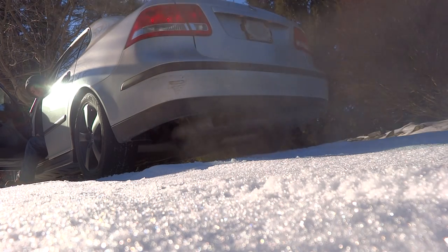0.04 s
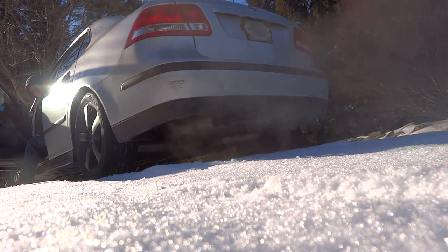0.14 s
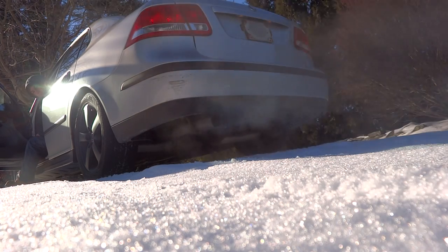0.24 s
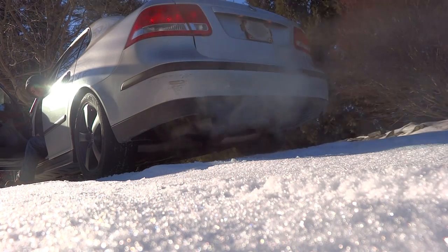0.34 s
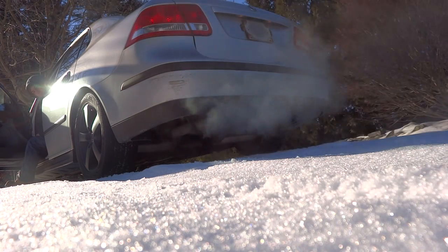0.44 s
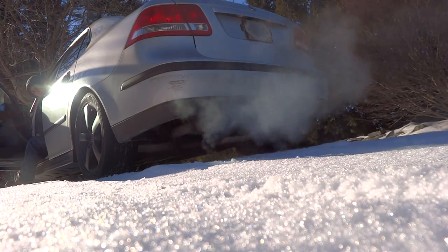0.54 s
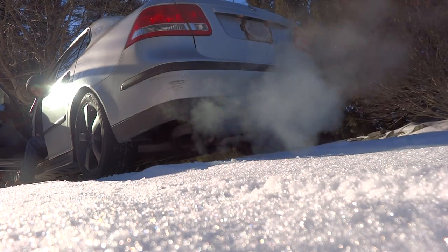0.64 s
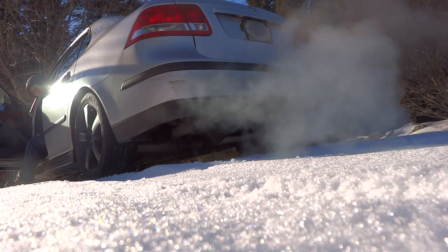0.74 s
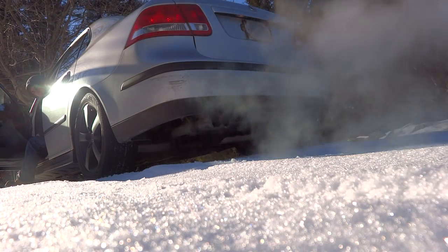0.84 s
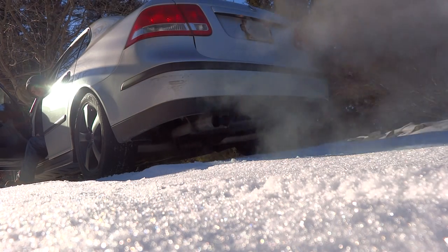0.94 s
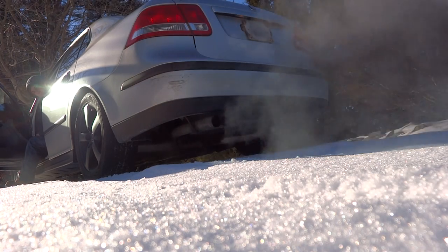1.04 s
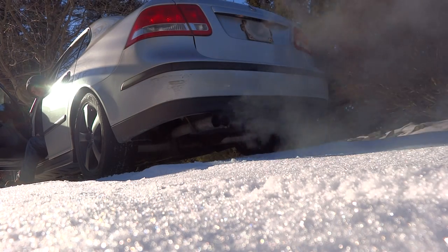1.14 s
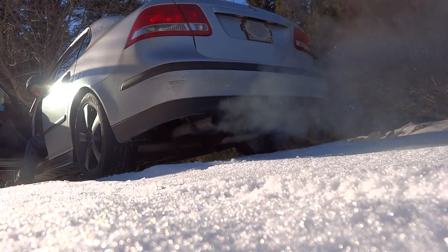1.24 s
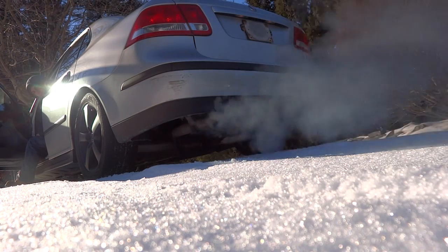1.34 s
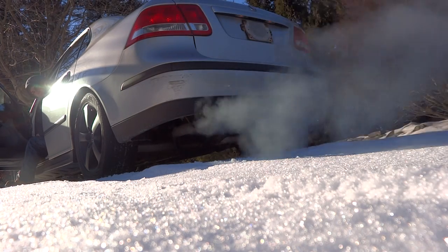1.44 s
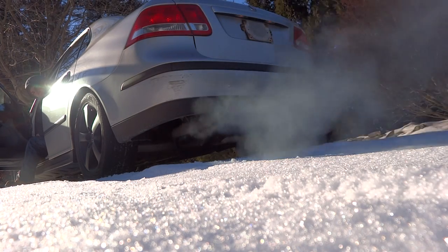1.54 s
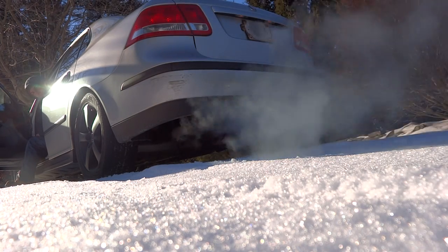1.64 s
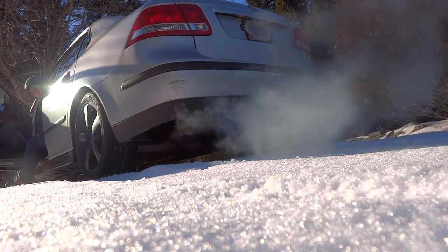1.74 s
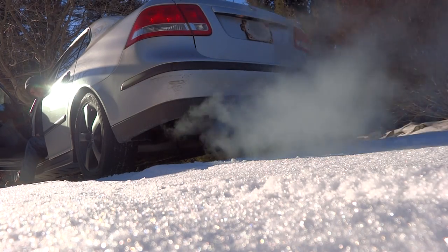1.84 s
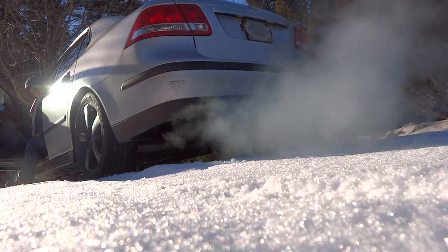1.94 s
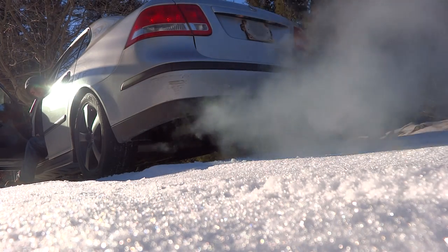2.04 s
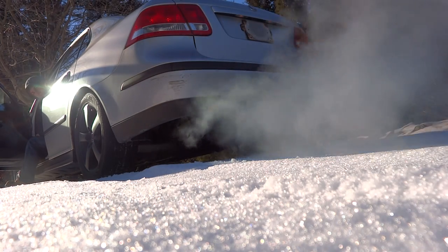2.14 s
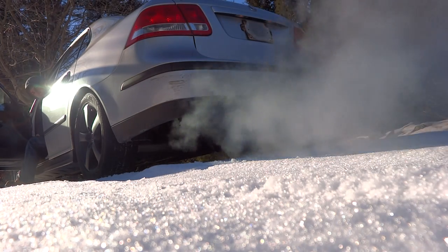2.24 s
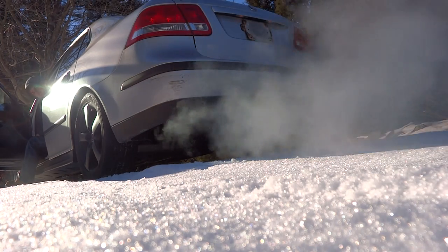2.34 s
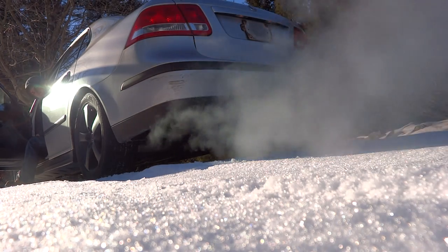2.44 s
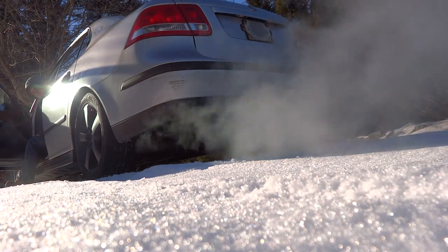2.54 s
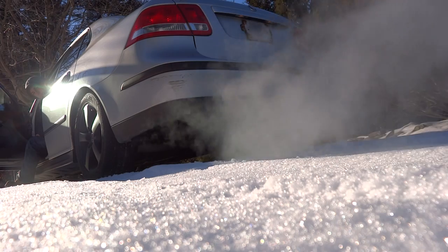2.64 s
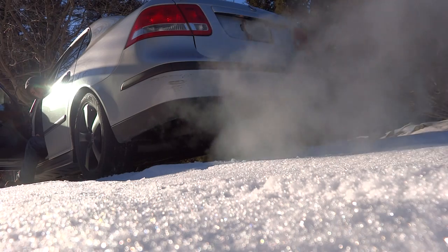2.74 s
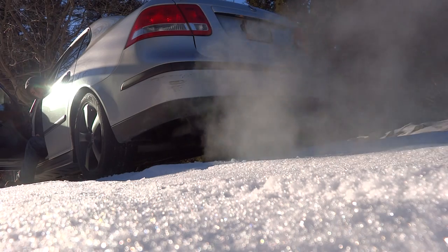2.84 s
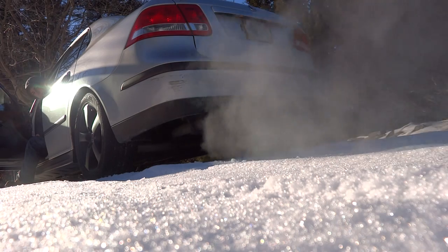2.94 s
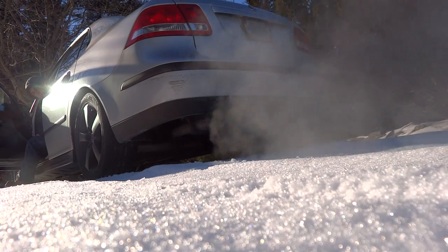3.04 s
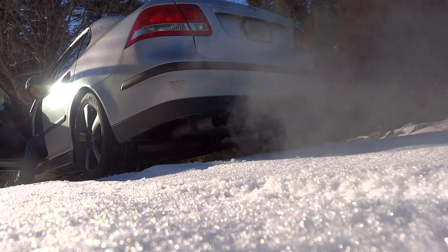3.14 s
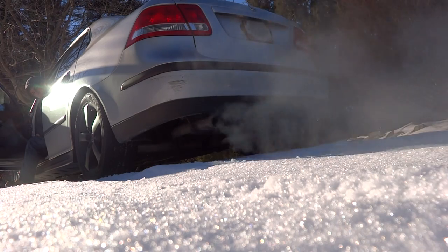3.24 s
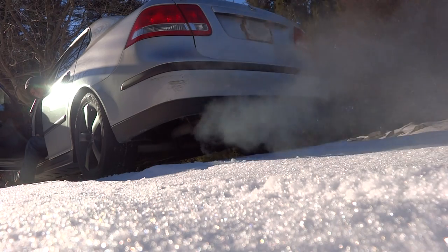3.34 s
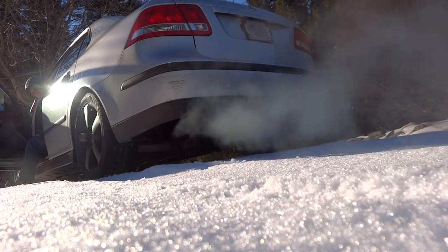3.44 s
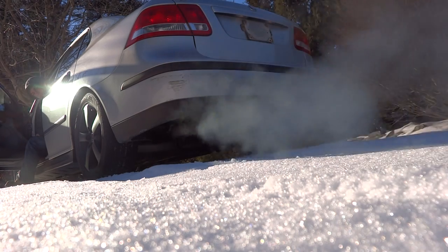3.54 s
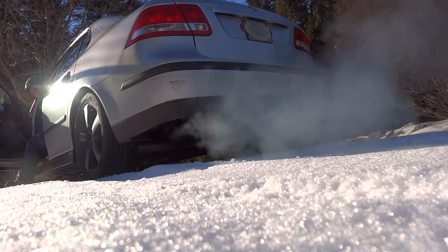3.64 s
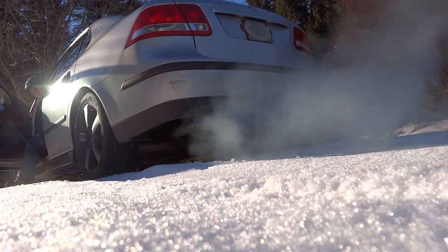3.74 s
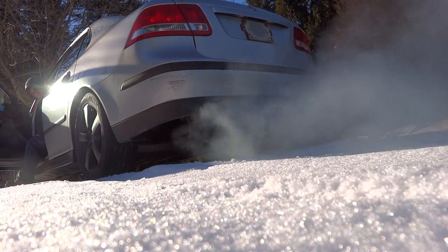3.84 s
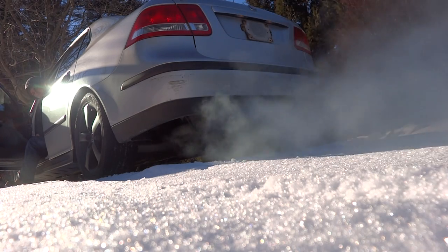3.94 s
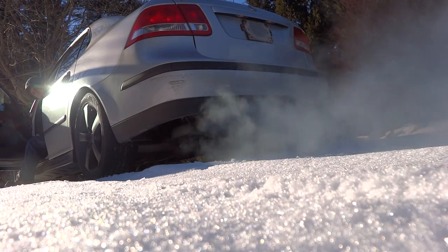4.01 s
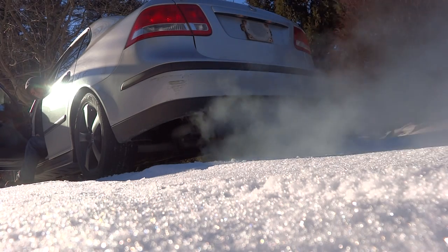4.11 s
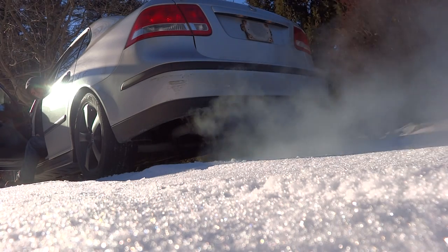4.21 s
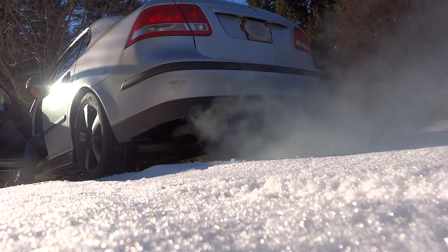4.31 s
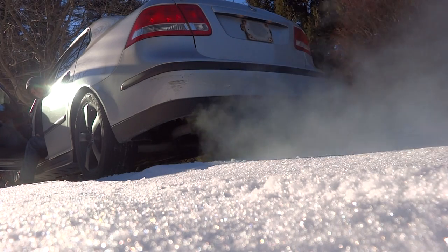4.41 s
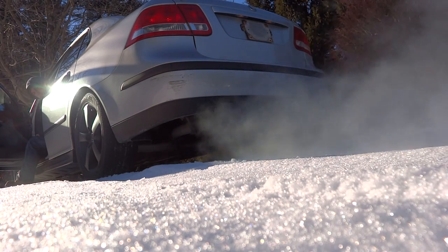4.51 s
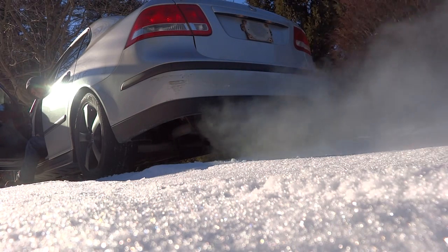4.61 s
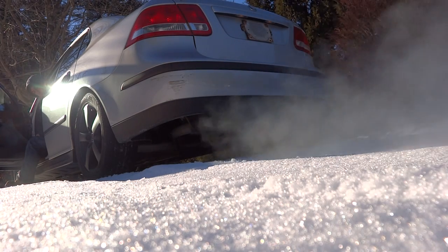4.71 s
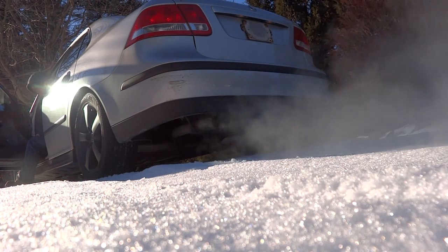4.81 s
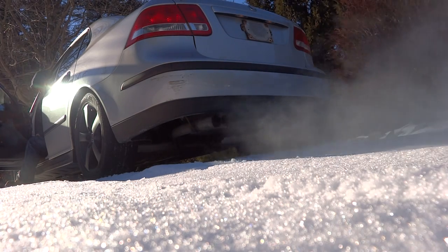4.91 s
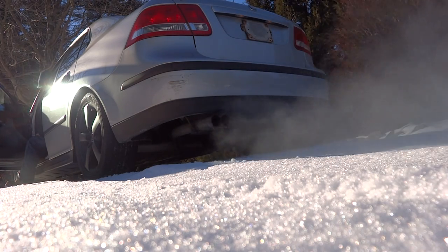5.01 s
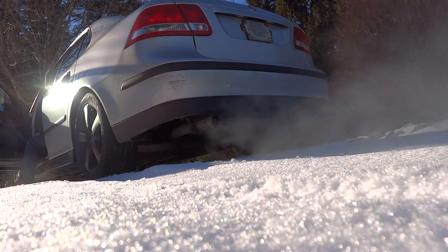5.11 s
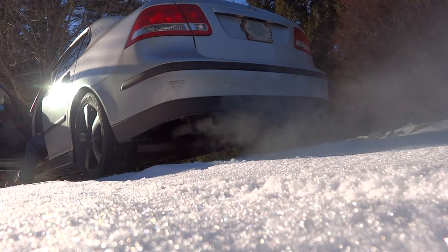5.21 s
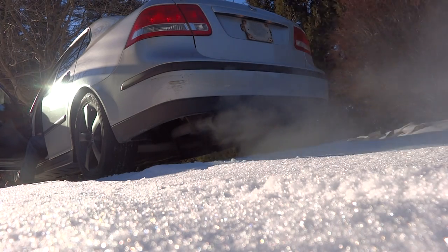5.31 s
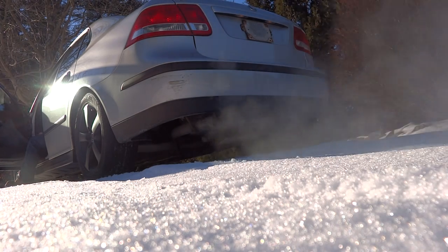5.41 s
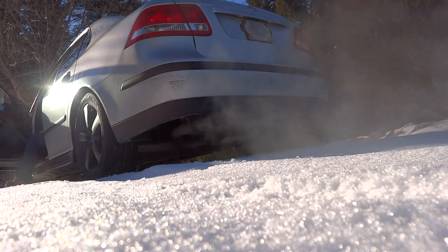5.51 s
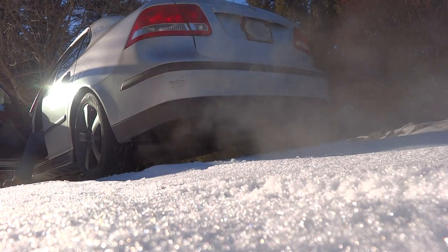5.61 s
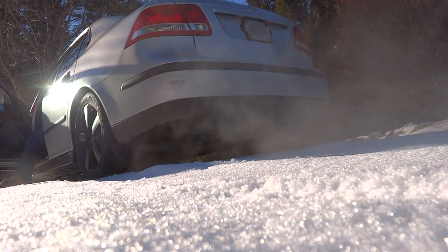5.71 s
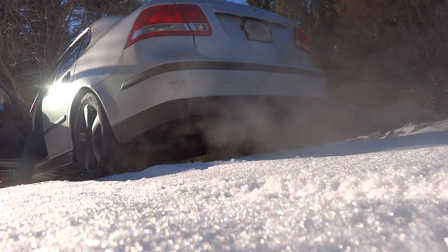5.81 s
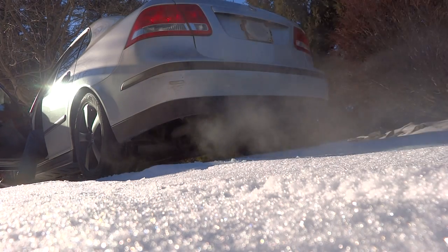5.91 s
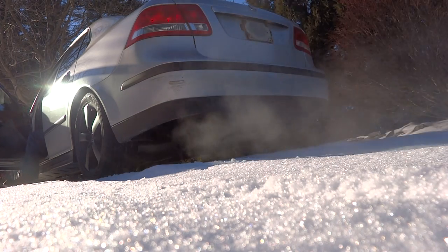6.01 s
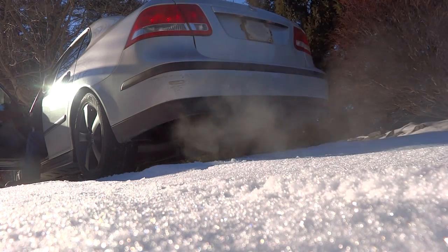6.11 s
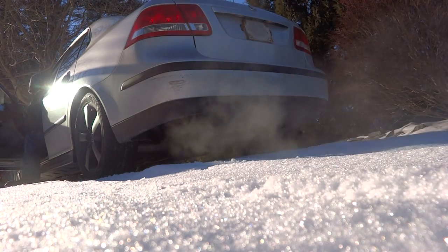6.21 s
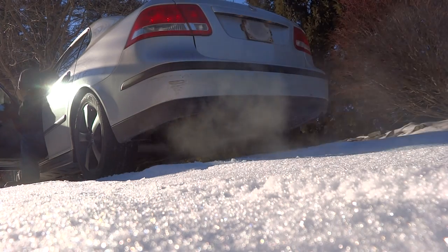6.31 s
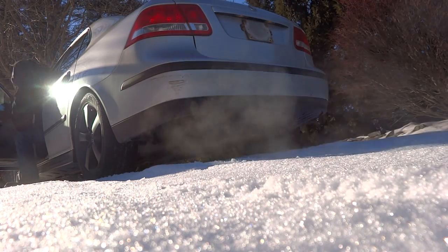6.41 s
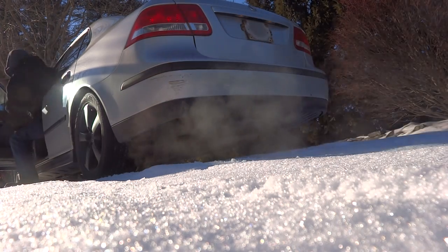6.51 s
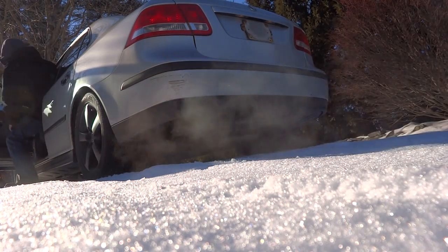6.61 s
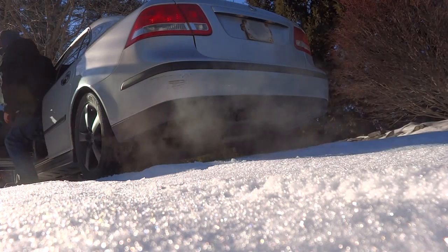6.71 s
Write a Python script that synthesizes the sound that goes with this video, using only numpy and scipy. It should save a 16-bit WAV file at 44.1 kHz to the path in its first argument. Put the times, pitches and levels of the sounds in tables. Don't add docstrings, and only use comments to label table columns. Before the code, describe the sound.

Outdoors on snow, close behind a car's exhaust tips, an engine already falling from a rev surges up with a raspy roar, crackles metallically at the peak, then drops away. A second, slightly lower rev follows and decays in a long hollow burble, sinking to a much quieter, low idle with faint puffing and a thin high whine.

```python
import sys
import numpy as np
from scipy import signal
from scipy.fft import rfft, irfft
from scipy.io import wavfile
from scipy.ndimage import uniform_filter1d

SR = 44100
rng = np.random.default_rng(int(sys.argv[2]) if len(sys.argv) > 2 else 0)


def voltage_ratio(level):
    return 10 ** (np.asarray(level, float) / 20)


def master_out(mix):
    frames = np.transpose(np.atleast_2d(mix))
    ceiling = np.clip(frames, -1, 1)
    pcm = np.round(ceiling * 32767).astype(np.int16)
    wavfile.write(sys.argv[1], SR, pcm)


N = 298116
SLOW_BELOW_HZ = 132

# (strength_db, rise_db per octave of speed, silencer_corner_hz, cylinder_difference_db)
STATE_TONE = [
    (-13, 8.5, 495, -14),
    (-17.5, 6, 470, -11.5),
    (-38, 0.84, 219, -22),
]
# (order_2_db, order_3_db, order_4_db, each_further_order_db)
PULSE_SHAPE = [
    (-7.5, -11, -13, -0.59),
    (0.6, -0.3, 2, -4),
    (4, 8.5, 9, -0.75),
]


def exhaust(t, turns):
    slow, coarse, spin = t[::64], t[::4], turns[::4]
    hz = speed(slow)
    state, gulp, misfire, trim_db = driver(slow)
    coasting, pulling, idling = state
    strength_db, per_octave, corner, half_db = np.transpose(STATE_TONE) @ state
    second, third, fourth, further = np.transpose(PULSE_SHAPE) @ state
    slowness = np.minimum(hz / SLOW_BELOW_HZ, 1)
    corner = corner * slowness ** (0.35 * coasting)
    lift_db = 6 * coasting * np.maximum(np.log2(SLOW_BELOW_HZ / hz), 0)
    strength_db = strength_db + per_octave * np.log2(hz / 120) + trim_db

    steady_db, opening_db, misfiring_db, idling_db = -22, -10, -2, -25
    scatter_db = steady_db + 2 * np.maximum(np.log2(95 / hz), 0)
    scatter_db += (idling * (idling_db - scatter_db) + gulp * (opening_db - steady_db)
                   + misfire * (misfiring_db - steady_db))

    wander = np.interp(spin, np.arange(1000), rng.standard_normal(1000))
    late = 0.01 * (1 - 0.5 * np.interp(coarse, slow, pulling)) * wander

    orders = np.zeros(len(coarse))
    for k in [*range(1, 28), *np.arange(.5, 10), *np.arange(.25, 6, .5)]:
        whole = int(np.ceil(k)) + (k < 1)
        if whole < 4:
            level_db = [-17.5 * gulp, second, third][whole - 1]
        else:
            level_db = fourth + further * (whole - 4)
        box_hum = 0.4137 + np.exp(-((k * hz - 266) / 35) ** 2)
        hum_db = lift_db * box_hum * (k > 2)
        z = pipe(k * hz, pulling, slowness ** 0.28)
        z = z * silencer(k * hz, corner) * voltage_ratio(strength_db + level_db + hum_db)
        if k % 1:
            quarter_db = -9 if k % .5 else 0
            z = z * uneven_share(k * hz, hz) * voltage_ratio(half_db - 2 * misfire + quarter_db)
        else:
            z = z * voltage_ratio(misfire * (-5 + k - 2.5))
        z = np.interp(coarse, slow, z.real) + 1j * np.interp(coarse, slow, z.imag)
        tone = z * np.exp(2j * np.pi * k * (spin + late * (k > 2)))
        orders += np.sqrt(2) * tone.real

    fired = new_firing(turns) * per_firing(turns, rng.uniform(-1.7, 1.7, 1000))
    click_db = strength_db + third + 0.91 * lift_db + scatter_db + 3.0
    size = np.interp(t, slow, voltage_ratio(click_db) * SR / hz)
    rung = irfft(rfft(fired * size, 2 * N) * pipe(np.fft.rfftfreq(2 * N, 1 / SR)))[:N]
    f, s, z = signal.stft(rung, SR, nperseg=2048)
    f, rate = f[:, None], np.interp(s, slow, hz)
    z *= silencer(f, np.interp(s, slow, corner)) * uneven_share(f, rate)
    z *= voltage_ratio(-.4 * f / rate)
    scattered = signal.istft(z, SR, nperseg=2048)[1][:N]
    return signal.resample_poly(orders, 4, 1)[:N] + scattered


# (time_s, firing_rate_hz)
FIRING_RATE = [(0, 137.2), (.1, 139.1), (.63, 104.8), (.68, 107), (1.1, 185.6), (1.19, 199.7),
               (1.26, 202.9), (1.4, 187), (2.52, 110.4), (2.63, 107), (2.69, 109.3), (3.1, 181.8),
               (3.188, 185.8), (3.3, 182.4), (5.0, 77.53), (5.911, 33.6), (6.002, 35.4), (6.302, 29.5)]


def speed(t):
    drag_hz = 120
    s, hz = np.transpose(FIRING_RATE)
    return np.exp(np.interp(t, s, np.log(hz + drag_hz))) - drag_hz


# (opens_s, shuts_s, misfiring_after_shut_s, trim_db until the next stab)
THROTTLE = [
    (-.3, 0.074, 0.09, 2.5),
    (0.648, 1.202, 0.18, -0.85),
    (2.642, 3.2, .13, -0.61),
]


def driver(t):
    open_s, shut_s, gulp_s = 0.03, 0.046, 0.022
    pull = sum(ramp(t, a, open_s) - ramp(t, b, shut_s) for a, b, _, _ in THROTTLE)
    gulp = sum(np.exp(-((t - a - open_s / 2) / gulp_s) ** 2) for a, _, _, _ in THROTTLE)
    misfire = sum(ramp(t, b, shut_s / 2) - ramp(t, b + c - shut_s, 2 * shut_s) for _, b, c, _ in THROTTLE)
    opens, trims = np.transpose(THROTTLE)[[0, 3]]
    idle = idle_share(t, 0.032)
    return np.array([1 - pull - idle, pull, idle]), gulp, misfire, trims[np.searchsorted(opens, t) - 1]


def idle_share(t, length_s):
    return ramp(t, 5.93, length_s)


def ramp(t, start, length):
    return np.clip((t - start) / length, 0, 1)


# (pitch_hz, width_hz, gain, whose sign is the phase)
STANDING_WAVES = [(63, 14.4, 2.35), (106.1, 22.3, -2), (152.5, 13.1, 1.97), (187, 32.6, -1.09),
                  (238.9, 12.9, 2.5), (286.1, 13.6, -2), (332.8, 23.3, 2.1), (388.9, 33, -1.38),
                  (416.6, 17.3, -0.74), (496.7, 24.9, 1.71), (501.1, 79.5, -1.2), (613.4, 50, 1.87),
                  (615.6, 30.2, -2), (780, 270, 0.9658)]


def pipe(hz, pull=0, calm=1):
    lead_s, twist = .0105, 3.1
    cool = hz / 1.065 ** pull
    wide = 0.97 ** pull * calm
    modes = sum(gain / (calm + 2j * calm * (cool - f) / (width * wide)) for f, width, gain in STANDING_WAVES)
    return modes * np.exp(1j * (2 * np.pi * hz * lead_s + twist))


def silencer(hz, corner_hz):
    treble_cut = (1 + (hz / corner_hz) ** 4) ** (-4.06 / 4)
    return treble_cut * hz ** 2 / (hz ** 2 + 109 ** 2)


def uneven_share(f, hz):
    over = f / np.maximum(hz, 170)
    return over ** 3 / (over ** 3 + 0.15)


def per_firing(turns, values):
    return values[turns.astype(int)]


def new_firing(turns):
    return np.diff(np.floor(turns), prepend=0)


# (firing_rate_hz, rasp_db, fizz_db)
COASTING_GAS = [(34, -58, -74), (59, -52, -51.5), (80, -52, -60.5), (94, -50.5, -58.5), (107, -46, -52),
                (140.6, -45.5, -59), (158.5, -33.5, -52.5), (171, -38.5, -56), (194, -35.5, -53)]
# (pitch_hz, level_db)
RASP_COLOUR = [(470, -7), (800, -2.5), (1010, -5.5), (1140, 2), (1430, -4), (1630, 3), (1940, -3.5),
               (3060, -3), (4700, -15.5), (5900, -23.5), (6500, -20.5), (8450, -44.5), (14300, -120)]
# (pitch_hz, level_db)
FIZZ_COLOUR = [(2650, -40), (4500, -6.5), (8110, 1), (9200, 1), (13300, -1), (14200, -6), (15800, -21.5)]
# (pitch_hz, level_db)
RUSH_COLOUR = [(40, -8), (90, -8), (250, -6), (420, -4), (620, 1.5), (800, -18), (1000, -28.5)]
# (pitch_hz, width_hz, level_db)
TIP_RINGS = [(1015, 31, -6.5), (1608, 11, -10), (2060, 61, 1.5), (2540, 22, 3), (3150, 51, -11),
             (3530, 32, -8.5)]


def gas(t, turns):
    hz = speed(t)
    state, gulp, _, trim_db = driver(t)
    _, pulling, idling = state
    octaves = np.log2(hz / 120)
    coast_rasp_db, coast_fizz_db = curves(COASTING_GAS, hz)
    rasps = [coast_rasp_db + 1.9 * trim_db,
             -34 + 8.7 * octaves,
             -78.5 + 6.2 * (1 - idle_share(t, 0.39))]
    fizzes = [coast_fizz_db + 1.3 * trim_db,
              -58.5 + 11.8 * octaves - 10.5 * gulp,
              -78]
    rasp_db = sum(share * db for share, db in zip(state, rasps))
    fizz_db = sum(share * db for share, db in zip(state, fizzes))

    level = np.hypot(voltage_ratio(rasp_db), rattling(t, column=3))
    hiss = np.minimum(level, voltage_ratio(-66))
    puffed = puffs(turns + .12, hz, decay_s=.0004 + .12 / hz, spread_db=2.4 - 1.2 * pulling,
                   steady=.11 + .08 * ramp(-hz, -110, 60))
    puffed = puffed + 0.44 * pulling * new_firing(turns + .12) * np.sqrt(SR / hz)
    flow = hiss * rng.standard_normal(N) + np.sqrt(abs(level ** 2 - hiss ** 2)) * puffed
    rasp = coloured(flow, RASP_COLOUR)
    lazy = .8 * ramp(-hz, -99, 55)
    rasp = (1 - lazy) * rasp + lazy * 1.67 * resonate(rasp, 1400, 1500)
    rasp += sum(resonate(rasp, f, width) * voltage_ratio(db) for f, width, db in TIP_RINGS)
    rasp = np.std(flow) * evened(rasp)

    fizz_steady = .45 - .3 * ramp(-hz, -53.5, 15) * (1 - idling)
    fizz = coloured(puffs(turns + 0.5, hz, decay_s=0.0031, spread_db=1.0, steady=fizz_steady), FIZZ_COLOUR)
    rush = coloured(puffs(turns, hz, decay_s=0.0037, spread_db=1.0, steady=0.29), RUSH_COLOUR)
    rush_db = -38 + 0.65 * (rasp_db + 50) - 3.1 * pulling - 3 * idling
    return voltage_ratio(rush_db) * rush + rasp + voltage_ratio(fizz_db) * fizz


def puffs(turns, hz, decay_s, spread_db, steady):
    luck = np.clip(rng.standard_normal(2000), -1.6, 1.6)
    strength = voltage_ratio(spread_db * per_firing(turns, luck))
    gate = steady * (hz + 40) / 160 + strength * np.exp(-(turns % 1) / (hz * decay_s))
    return gate / np.sqrt(uniform_filter1d(gate ** 2, 6000)) * rng.standard_normal(N)


def curves(rows, t):
    s, *columns = np.transpose(rows)
    return [np.interp(t, s, c) for c in columns]


def evened(x):
    return x / np.sqrt(np.mean(x ** 2) + 1e-20)


def coloured(x, points):
    f, level_db = np.transpose(points)
    hz = np.fft.rfftfreq(len(x), 1 / SR)
    gain_db = np.interp(np.log(hz + 1), np.log(f), level_db, -80, -80)
    return evened(irfft(rfft(x) * voltage_ratio(gain_db), len(x)))


def resonate(x, hz, width):
    return signal.lfilter(*signal.iirpeak(hz, hz / width, SR), x)


# (pitch_hz, level_db)
CRACKLE_COLOUR = [(590, -39), (1000, -36.5), (1640, -27.5), (2300, -19), (3790, -10), (5940, -16),
                  (9230, -17.5), (12900, -27), (15900, -37)]


def crackle(t, turns):
    clicks = puffs(turns + .12, speed(t), decay_s=.0004, spread_db=2.6, steady=.03)
    return voltage_ratio(-2.2) * rattling(t, column=2) * coloured(clicks, CRACKLE_COLOUR)


# (start_s, length_s, clicks_db, rasp_db)
LOOSE_PART = [(.9, 0.12, -45, -30), (1.162, 0.03, -37, -33), (1.242, .012, -23, -31.5),
              (1.256, .03, -37.5, -31.5), (1.347, .028, -20, -30), (1.376, .08, -26, -29),
              (1.452, .03, -39.5, -30), (3.105, .02, -39, -31.5), (3.251, 0.0066, -33.5, -36),
              (3.273, 0.043, -38, -32), (3.307, 0.059, -55.5, -32.5), (6.746, .03, -61, -57.5)]


def rattling(t, column):
    edge_s, fade_s = .006, .012
    return sum(voltage_ratio(row[column]) * (ramp(t, row[0], edge_s) - ramp(t, row[0] + row[1], fade_s))
               for row in LOOSE_PART)


# (time_s, pitch_hz, level_db)
BLOWER = [(5.55, 4720, -72), (5.79, 4410, -85), (5.9, 3990, -81), (6.14, 3720, -80), (6.32, 3010, -88),
          (6.52, 2620, -76), (6.64, 2430, -65), (6.76, 2430, -65.5)]


def whines(t, turns):
    hz, level_db = curves(BLOWER, t)
    pole = np.exp(-np.pi * 200 / SR)
    fuzz = signal.lfilter([1], [1, -2 * pole, pole ** 2], rng.standard_normal((2, N)))
    wobbly = .5 + evened(fuzz[0]) + 1j * evened(fuzz[1])
    blower = (wobbly * np.exp(2j * np.pi * np.cumsum(hz) / SR)).real
    throb = 1 + 0.39 * np.cos(2 * np.pi * turns)
    blower = voltage_ratio(level_db + 5.5) * blower * throb * ramp(t, 5.45, 0.1525)
    pump = voltage_ratio(-69) * (.5 + .5 * ramp(t, 5.5, .5)) * np.sin(2 * np.pi * 8340 * t)
    return blower + pump


def background():
    return voltage_ratio(-77.0) * coloured(rng.standard_normal(N), [(30, -6.5), (400, 0), (1200, -32), (15000, -30.5)])


def scene():
    t = np.arange(N) / SR
    turns = np.cumsum(speed(t)) / SR
    mono = exhaust(t, turns) + gas(t, turns) + crackle(t, turns) + whines(t, turns) + background()
    return np.array([mono, mono])


def roll_off(x):
    return signal.sosfilt(signal.butter(12, 16050, fs=SR, output="sos"), x)


def record(dry):
    level_db = 10 * np.log10(abs(uniform_filter1d(dry[0] ** 2, 12000)) + 1e-12)
    quiet_db, loud_db = 0.6, -5.5
    ratio = voltage_ratio(quiet_db + (loud_db - quiet_db) * ramp(level_db, -28, 8))
    hz = np.fft.rfftfreq(N, 1 / SR)
    bass = irfft(rfft(dry[0]) / (1 + (hz / 400) ** 2.4), N)
    side = bass * (ratio - 1) / (ratio + 1)
    mix = np.tanh(dry + np.array([side, -side]))
    return roll_off(mix)


dry = scene()
out = record(dry)
master_out(out)
```